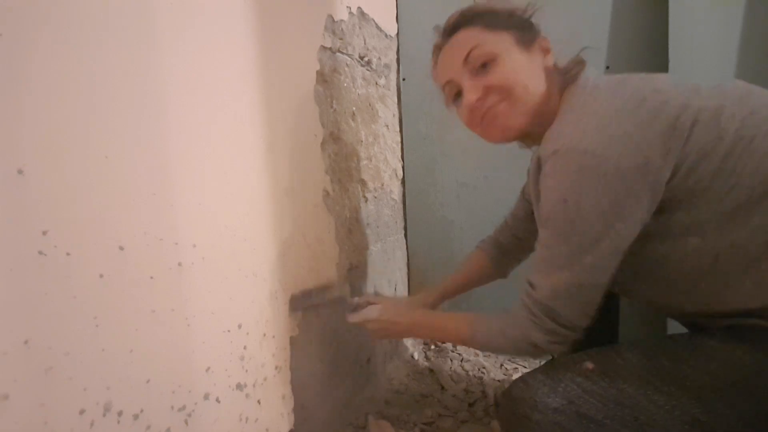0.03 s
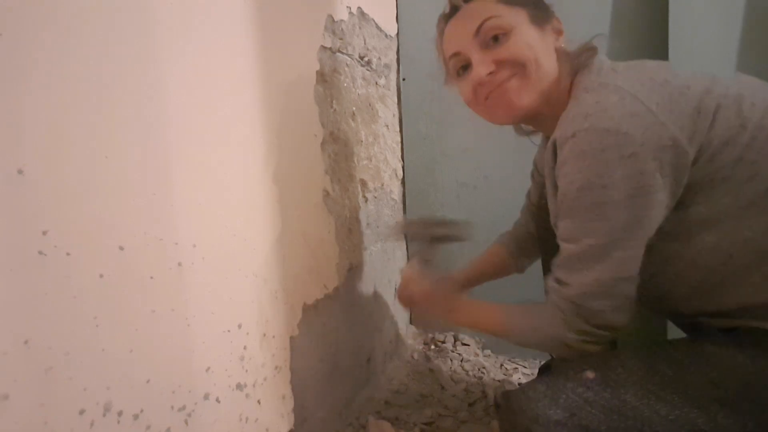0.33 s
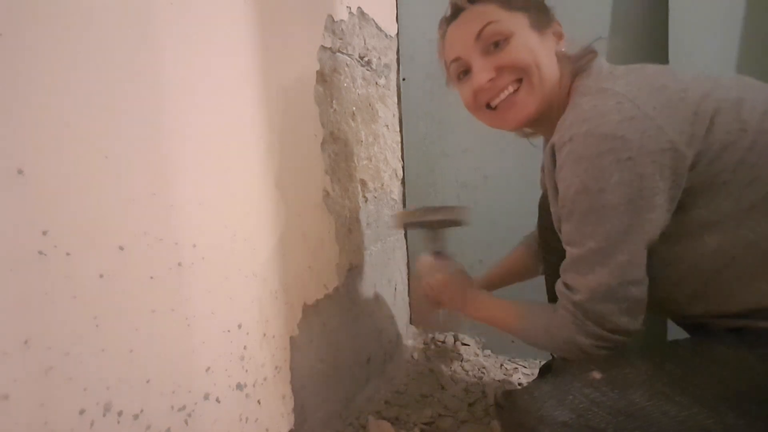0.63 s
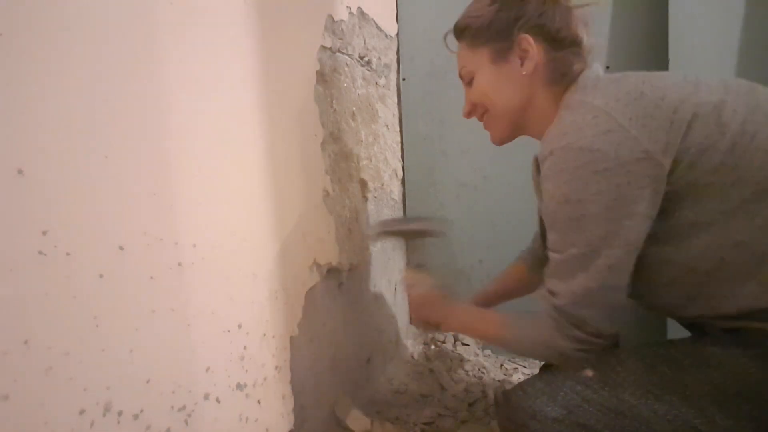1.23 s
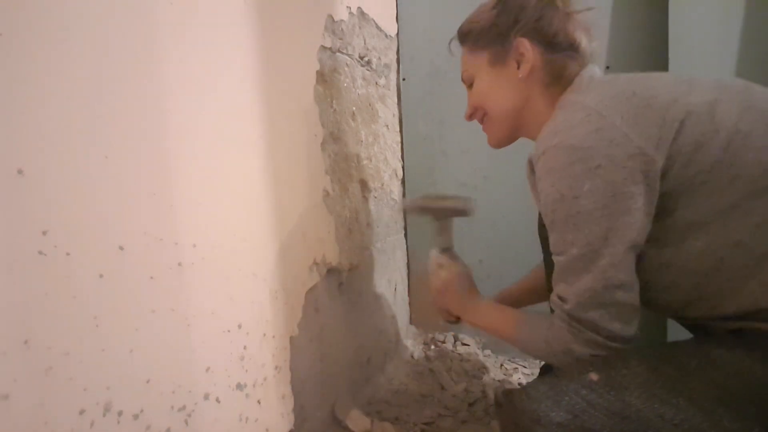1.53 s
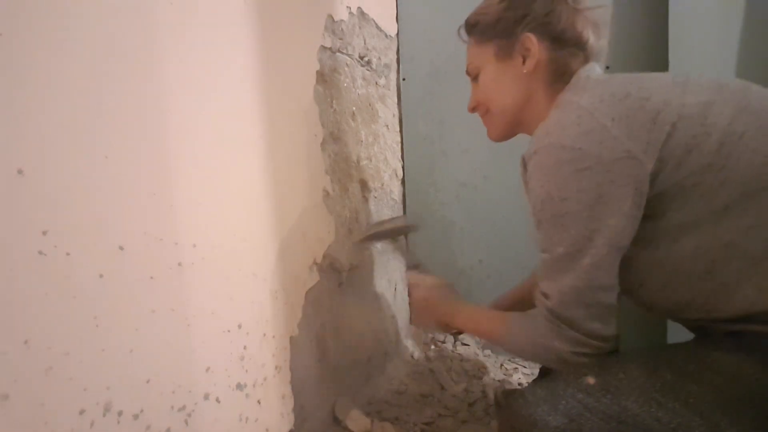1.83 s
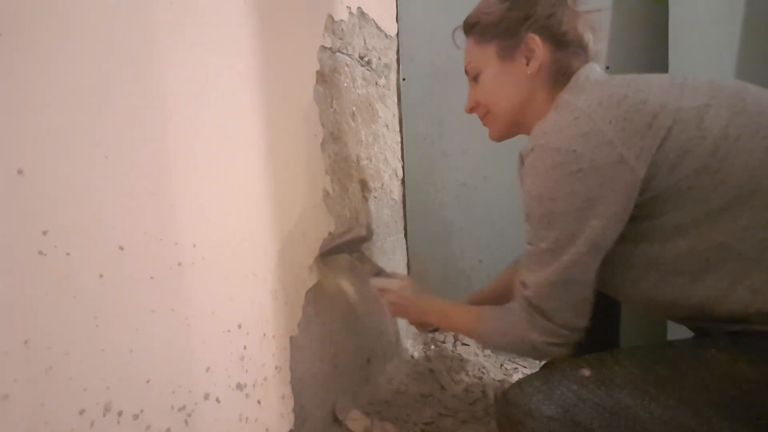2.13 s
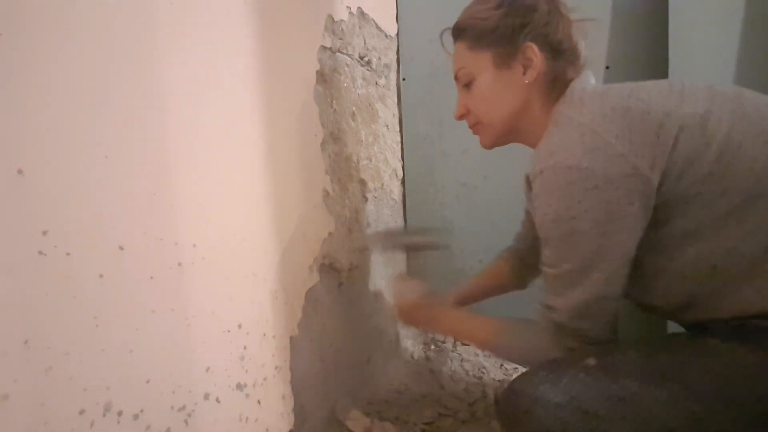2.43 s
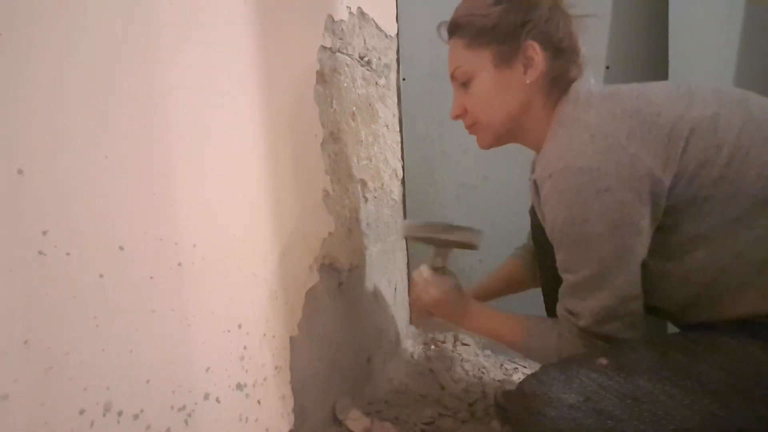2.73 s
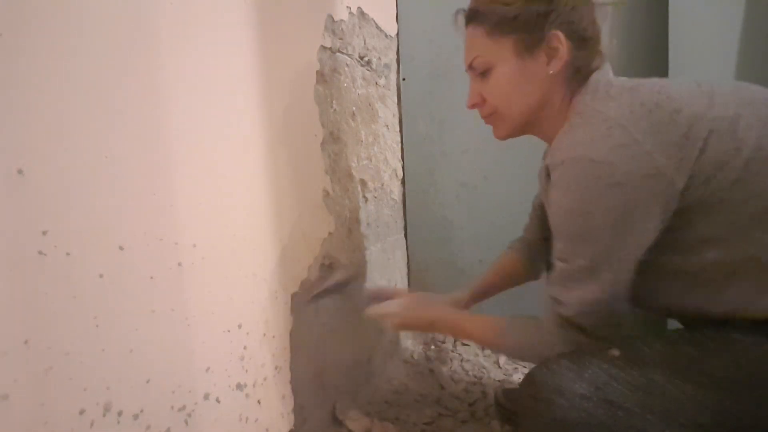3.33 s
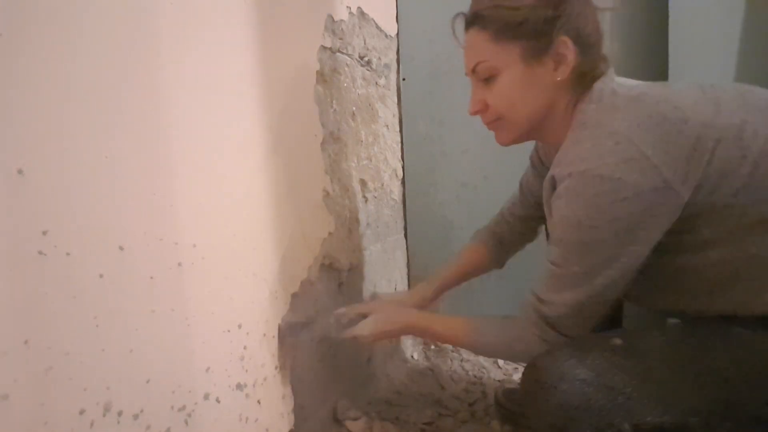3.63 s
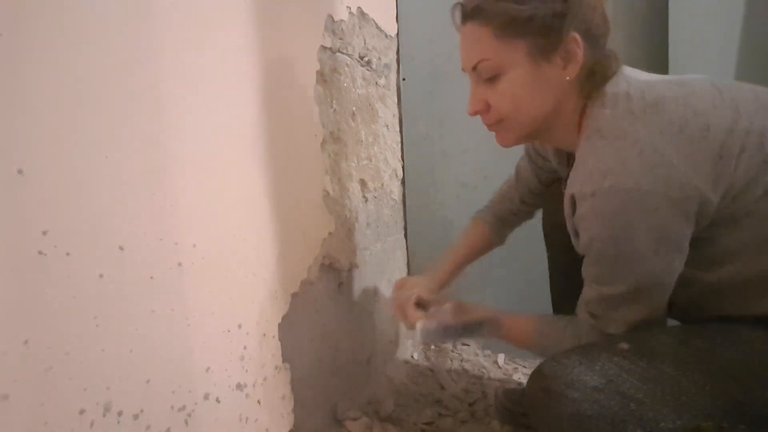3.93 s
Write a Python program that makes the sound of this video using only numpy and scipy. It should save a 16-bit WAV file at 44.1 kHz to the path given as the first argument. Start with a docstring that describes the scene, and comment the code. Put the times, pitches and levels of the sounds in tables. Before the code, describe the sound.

A hammer knocks crumbling plaster off a wall in steady blows as debris falls.

```python
"""A hammer knocks old plaster off a wall corner: ten steady blows in a small bare room.
Each blow is an impulse plus a burst of fractures, coloured by two resonances of the loose slab.
Between blows grit trickles down, chips tick and lumps thud on the rubble below.
Early reflections, a diffuse tail and standing waves follow each impact, over a low steady hush."""
import sys
import numpy as np
from scipy import signal
from scipy.fft import rfft, irfft
from scipy.io import wavfile
from scipy.ndimage import uniform_filter1d

SR = 44100
rng = np.random.default_rng(int(sys.argv[2]) if len(sys.argv) > 2 else 0)


def unload_audio(sound):
    """Save the sound as a 16-bit wav file, at the path given as the first command line argument."""
    columns = np.transpose(np.atleast_2d(sound))
    # keep every value between -1 and 1, then stretch to whole-number steps
    steps = np.round(np.clip(columns, -1, 1) * 32767)
    wavfile.write(sys.argv[1], SR, steps.astype(np.int16))


N = 176400
FFT_SIZE = 8192
HZ = np.fft.rfftfreq(FFT_SIZE, 1 / SR)


def amp(db):
    """Amplitude ratio: a factor of ten for every 20 dB."""
    return 10 ** (np.asarray(db) / 20)


def curve_at(points, hz):
    """Interpolation of a table on a logarithmic frequency axis."""
    table_hz, values = np.transpose(points)
    return np.interp(np.log(hz + 1), np.log(table_hz), values)


def add(mix, start_s, sound):
    """Superposition: a sound adds to the mix from its start time on."""
    part = mix[..., round(start_s * SR):][..., :sound.shape[-1]]
    part += sound[..., :part.shape[-1]]


def colour(x, gain_db):
    """Minimum-phase filtering: a causal response with the given gain at each of HZ."""
    log_gain = np.log(amp(np.maximum(gain_db, -100)))
    mirrored = np.r_[log_gain, log_gain[-2:0:-1]]
    taps = np.fft.ifft(np.exp(np.conj(signal.hilbert(mirrored)))).real
    return signal.fftconvolve(x, taps[:FFT_SIZE // 2])


def resonance(centre_hz, width):
    """Lorentzian peak of height one; width is its half width over its centre frequency."""
    return 1 / (1 + ((HZ - centre_hz) / (width * centre_hz)) ** 2)


def fracture_burst(envelope):
    """Dense tiny fractures merge into broadband noise under an envelope, with unit energy."""
    x = rng.standard_normal(len(envelope)) * envelope
    for _ in range(4):  # flatten the spectrum, then restore the envelope
        spectrum = rfft(x)
        x = irfft(spectrum / (abs(spectrum) + 1e-12), len(x))
        x = x * envelope / np.sqrt(abs(uniform_filter1d(x ** 2, size=64)) + 1e-12)
    return x / np.linalg.norm(x)


def diffuse_field(samples, bass_coherence=0.95, mic_gap_s=0.00041):
    """Short-time spectra of a diffuse field: coherence between two microphones follows a sinc law."""
    hz, frame_s, noise = signal.stft(rng.standard_normal((2, samples)), SR, nperseg=512, noverlap=384)
    coherence = bass_coherence * np.sinc(2 * hz * mic_gap_s)[:, None]
    right = coherence * noise[0] + np.sqrt(1 - coherence ** 2) * noise[1]
    return hz, frame_s, np.array([noise[0], right])


# Spectrum of the background noise: frequency_hz, relative_density_db
HUSH_SPECTRUM = [(25, -8), (55, -18), (120, -11.5), (300, -7), (1000, -16.5), (3000, -23.5), (7000, -37),
                 (15000, -38)]
def hush(level_db=-51):
    """Stationary diffuse noise, strongest in the bass, forms the room's background."""
    hz, _, field = diffuse_field(N)
    field = field * amp(curve_at(HUSH_SPECTRUM, hz))[:, None]
    noise = signal.istft(field, nperseg=512, noverlap=384)[1][:, :N]
    return amp(level_db) * noise / noise.std()


def whiten(response):
    """Spectral whitening levels the broad humps of a stereo response and keeps its fine structure."""
    spectrum = rfft(response, 2 * response.shape[1])
    power = uniform_filter1d((abs(spectrum) ** 2).mean(0), size=130)
    return irfft(spectrum / np.sqrt(power))[:, :response.shape[1]]


# Reverberation time: frequency_hz, t60_s
ROOM_DECAY = [(60, 0.74), (160, 0.62), (420, 0.4639), (1100, 0.3849), (2900, 0.3248), (7700, 0.35),
              (15000, 0.21)]
# Early reflections: delay_s, left_gain, right_gain
REFLECTIONS = [(.0032, -0.031, 0.18), (0.0097, -.25, -0.07), (0.0123, 0.098, 0.19),
               (0.0163, -0.066, -0.088)]
# Spectrum of the direct path: frequency_hz, gain_db
DIRECT_PATH = [(60, -9.5), (400, -6), (1100, -1), (3000, 0), (10000, -0.5)]
def room(x, tail_db=2, build_up_s=0.0027):
    """Convolution with direct sound, early reflections and a decaying diffuse tail, new at each call."""
    t = np.arange(24576) / SR
    hz, frame_s, field = diffuse_field(len(t))
    decay = amp(-60 * frame_s / curve_at(ROOM_DECAY, hz)[:, None])
    tail = signal.istft(field * decay, nperseg=512, noverlap=384)[1][:, :len(t)]
    response = amp(tail_db) * whiten(tail * (1 - np.exp(-t / build_up_s)))
    for delay_s, left_gain, right_gain in REFLECTIONS:
        add(response, delay_s, np.array([[left_gain], [right_gain]]))
    add(response, 0, colour(np.ones(1), curve_at(DIRECT_PATH, HZ)))
    return signal.fftconvolve(x[None], response, axes=1)


# Normal modes of the room: pitch_hz, gain_db, t60_s
NORMAL_MODES = [(57.2, 15, 1.3), (88.7, 5.5, 0.51), (124, 11.5, 0.62), (241.5, 8, 0.39), (323.6, 3, 0.45),
                (395, 5, 0.31), (515, 1, 1.1), (761, 11, 0.43)]
def standing_waves(x):
    """Each normal mode rings as a damped sinusoid, alike at both microphones."""
    t = np.arange(SR) / SR
    response = np.zeros(SR)
    for pitch_hz, gain_db, t60_s in NORMAL_MODES:
        unit_peak = 2 * np.log(1000) / (t60_s * SR)  # scales the gain at resonance to one
        response += amp(gain_db - 60 * t / t60_s) * unit_peak * np.sin(2 * np.pi * pitch_hz * t)
    return signal.fftconvolve(x, response)[:N]


# Showers of grit: start_s, length_s, level_db
GRIT_SHOWERS = [(0.432, 0.042, -56), (0.618, 0.11, -52), (0.808, 0.13, -56.5), (1.122, .14, -35.5),
                (1.262, 0.017, -34), (1.28, 0.11, -51), (1.506, 0.34, -53), (1.966, .12, -45),
                (2.373, 0.034, -43), (2.456, 0.07, -46), (2.682, 0.046, -48), (3.073, .15, -43.5),
                (3.233, 0.14, -48.5), (3.44, 0.081, -45.5), (3.545, 0.12, -52.5), (3.663, 0.048, -44),
                (3.855, 0.11, -44)]
# Spectrum of a grain's impact: frequency_hz, gain_db
GRIT_SPECTRUM = [(60, -7.5), (300, 10), (800, 7.5), (1500, 8), (3000, 3.5), (5500, -6.5), (9000, -6.5),
                 (13000, -6), (16000, -14)]
def grit(grains_per_s=2500, spread_db=3.5, rise_s=0.014, fade_db=-3.5):
    """Shot noise: sand grains of very uneven size land at random instants, in showers."""
    envelope = np.zeros(N)
    for start_s, length_s, level_db in GRIT_SHOWERS:
        t = np.arange(0, length_s, 1 / SR)
        add(envelope, start_s, np.minimum(t / rise_s, 1) * amp(level_db + fade_db * t / length_s))
    sizes = amp(spread_db * np.minimum(rng.exponential(1, N), 4))
    signs = rng.choice([-1, 1], N)
    grains = sizes * signs * (rng.random(N) < grains_per_s / SR)
    return colour(envelope * grains / grains.std(), curve_at(GRIT_SPECTRUM, HZ))[:N]


# Chips striking the rubble: start_s, relative_level_db, ring_hz, ring_lift_db
CHIP_TICKS = [(1.172, 4.5, 2360, 3), (1.269, 4.5, 1295, 17), (1.547, -14, 8800, 7), (1.645, -4, 1290, 12.5),
              (1.695, 1.5, 7900, -1), (2.028, 2, 2280, 0.5), (2.048, -13, 5950, 0), (2.392, -7.5, 1404, 13),
              (2.49, -6, 2200, 13), (3.191, -7, 5070, -5), (3.439, -9.5, 9000, 9), (3.481, -0.5, 2280, -2),
              (3.681, -2, 2000, 11), (3.882, -6, 3560, 11.5), (3.921, -15, 8130, 0), (3.943, -2, 1330, 6.5)]
def chips(contact_s=0.00152, skirt_db_per_octave=-6):
    """Damped resonance: a brief contact makes each small hard flake tick around one frequency."""
    out, t = np.zeros(N), np.arange(FFT_SIZE // 8) / SR
    for start_s, level_db, ring_hz, lift_db in CHIP_TICKS:
        ring_db = lift_db * resonance(ring_hz, width=0.14)
        skirt_db = skirt_db_per_octave * abs(np.log2((HZ + 1) / ring_hz))
        trim_db = -4.5 - 3 * np.log2(ring_hz / 1000)  # offsets the wider band of a higher chip
        contact = fracture_burst(np.exp(-t / contact_s))
        add(out, start_s, colour(contact, level_db + trim_db + ring_db + skirt_db))
    return out


# Lumps landing on the rubble: start_s, relative_level_db, pitch_hz
LUMP_THUDS = [(1.133, 23.5, 282), (1.17, 23.5, 140), (1.21, 14.5, 377), (1.265, 14.5, 354), (1.62, 9, 160),
              (2.027, 24.5, 217), (2.39, 5, 168), (2.489, 10.5, 150), (2.78, 8, 229), (3.164, 11.5, 207),
              (3.47, 23.5, 225), (3.632, 4, 118), (3.954, 20, 160)]
def lumps(crush_s=0.003, skirt_db_per_octave=-13, top_octaves=0.27):
    """Inelastic impact: heavier pieces crush as they land, giving a dull thud with a rounded peak."""
    out, t = np.zeros(N), np.arange(FFT_SIZE // 4) / SR
    for start_s, level_db, pitch_hz in LUMP_THUDS:
        octaves_away = np.hypot(np.log2((HZ + 1) / pitch_hz), top_octaves) - top_octaves
        force = fracture_burst(np.exp(-t / crush_s))
        add(out, start_s, colour(force, level_db - 2.5 + skirt_db_per_octave * octaves_away))
    return out


# Spectrum common to all blows: frequency_hz, level_db
BLOW_SPECTRUM = [(25, -8), (40, 2.5), (55, 13.5), (100, 28.5), (200, 25), (400, 24), (800, 25.5),
                 (1500, 21), (2500, 16), (4000, 5.5), (6500, -5), (9000, -2.5), (12500, -4), (15500, -9.5)]
# Centres of a blow's six bands: thud_hz, body_hz, knock_hz, clack_hz, crack_hz, crunch_hz
BAND_CENTRES = [110, 230, 480, 1000, 2400, 6000]
# Part of a blow's energy that comes as crumbling: frequency_hz, share (0 to 1)
CRUMBLE_SHARE = [(100, 0.02), (1000, 0.23), (2500, 0.29), (5000, 0.75), (9000, 0.9)]
def hammer_blow(band_db, low_ring_hz, high_ring_hz, ring_lift_db=6):
    """Source and filter: crumbling and one hard contact share the energy and excite the same slab."""
    t = np.arange(5000) / SR
    tone_db = curve_at(BLOW_SPECTRUM, HZ) + curve_at(list(zip(BAND_CENTRES, band_db)), HZ)
    rings = resonance(low_ring_hz, width=0.053) + resonance(high_ring_hz, width=0.053)
    slab_db = tone_db + ring_lift_db * rings
    share = curve_at(CRUMBLE_SHARE, HZ)
    crust_breaking = np.exp(-t / 0.0028)
    sand_spray = amp(-25) * np.exp(-t / 0.018)
    crumbling = colour(fracture_burst(crust_breaking + sand_spray), slab_db + 10 * np.log10(share))
    contact = -colour(signal.unit_impulse(len(t)), slab_db + 10 * np.log10(1 - share))
    return crumbling, contact


# Hammer blows, each with its own band gains and slab resonances:
# start_s, thud_db, body_db, knock_db, clack_db, crack_db, crunch_db, low_ring_hz, high_ring_hz
HAMMER_BLOWS = [(0.0729, -4.5, 3, -4, -5, -2.5, -5, 210, 1250), (0.483, -1, 3, 2, -3.5, 1, 0, 627, 1550),
                (0.931, -1.5, 3, 4, -5, 0, 1.5, 251, 1340), (1.3675, 0, -5, -4.5, -3, 0, -0.5, 995, 1630),
                (1.7698, -2.5, -2.5, 7.5, -0.5, .5, -3, 1010, 1200),
                (2.1657, -6.5, -11, -3.5, 0.5, 1, 0, 670, 1570), (2.56, -1.5, 3, 0, -2, -3, -6, 955, 1430),
                (2.9357, -2.5, -6, -3.5, -1, 0.5, 1.5, 895, 1043),
                (3.321, -2, -3.5, 5, -4.5, -4, 0, 239, 2020),
                (3.7187, -2.5, 1, 4.5, -3.5, 1.5, 1.5, 249, 2690)]
def scene():
    """Superposition: debris and blows reverberate over the hush, and together drive the room's modes."""
    impacts = grit() + chips() + lumps()
    mix = hush() + room(impacts)[:, :N]
    for start_s, *band_db, low_ring_hz, high_ring_hz in HAMMER_BLOWS:
        for part in hammer_blow(band_db, low_ring_hz, high_ring_hz):
            add(impacts, start_s, part)
            add(mix, start_s, room(part))
    return mix + standing_waves(impacts)


def record(dry):
    """Soft saturation rounds the sharpest peaks; a low-pass filter then limits the band."""
    ceiling, cutoff_hz = 0.97, 16000
    rounded = dry / (1 + (dry / ceiling) ** 4) ** (1 / 4)
    low_pass = signal.firwin(511, cutoff_hz, window=("kaiser", 9), fs=SR)
    return signal.oaconvolve(rounded, low_pass[None], "same")


dry = scene()
out = record(dry)
unload_audio(out)
```